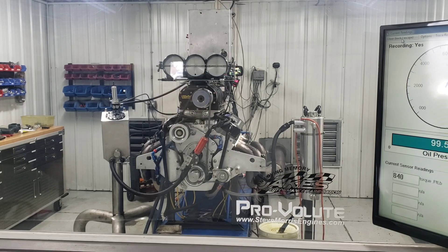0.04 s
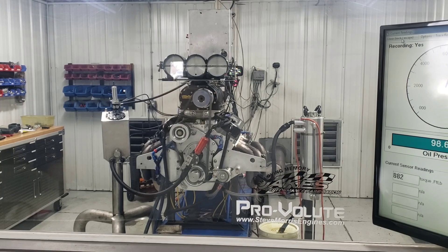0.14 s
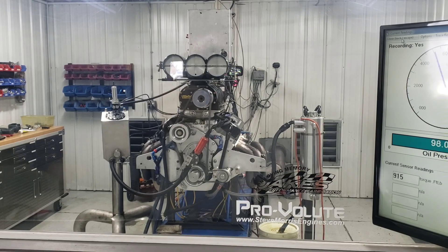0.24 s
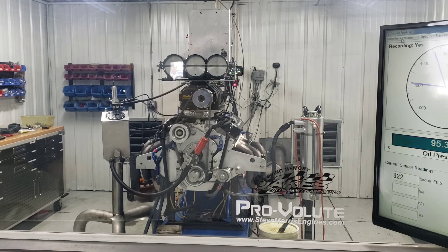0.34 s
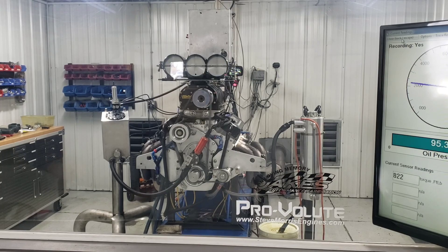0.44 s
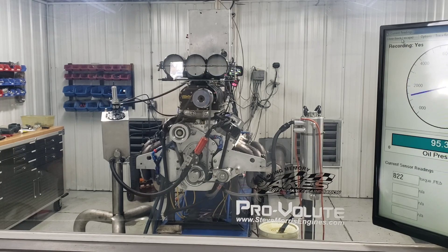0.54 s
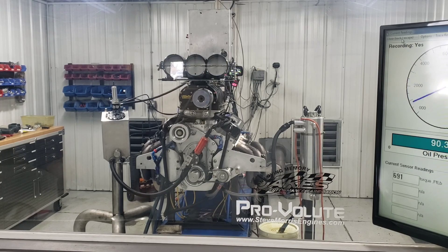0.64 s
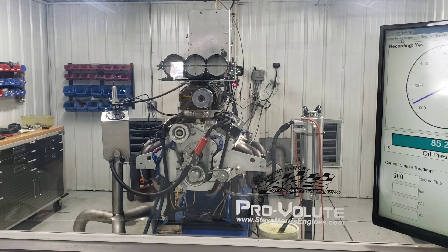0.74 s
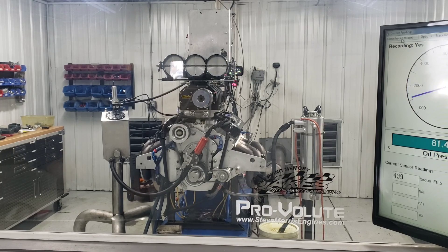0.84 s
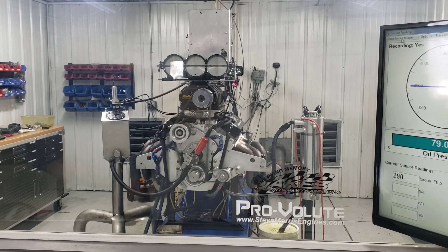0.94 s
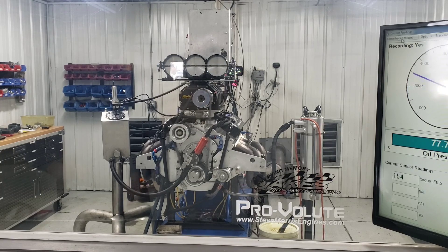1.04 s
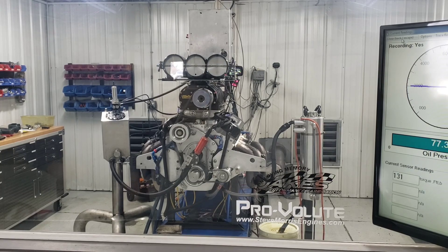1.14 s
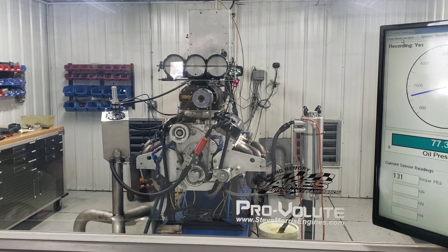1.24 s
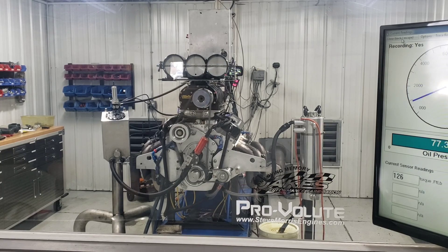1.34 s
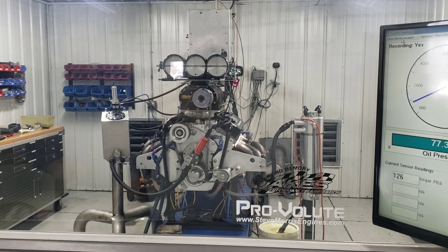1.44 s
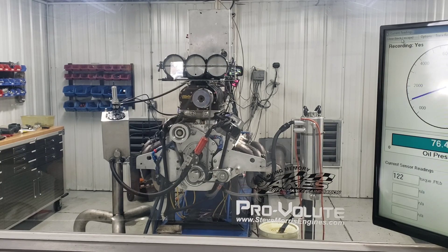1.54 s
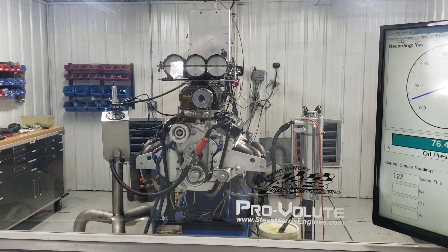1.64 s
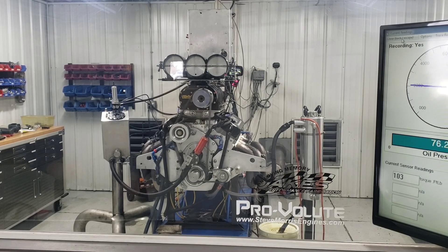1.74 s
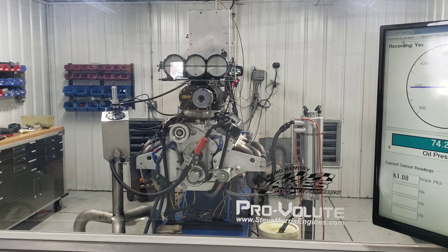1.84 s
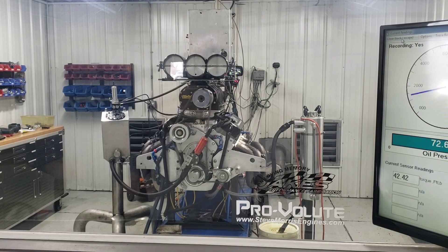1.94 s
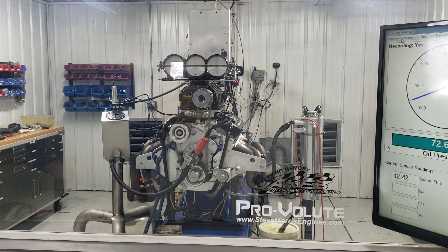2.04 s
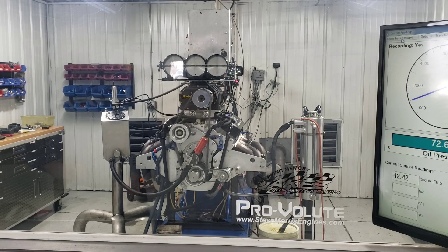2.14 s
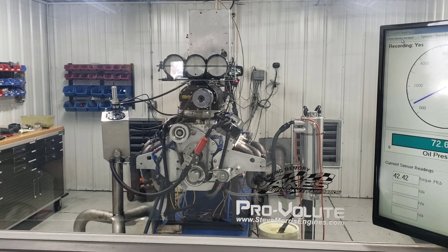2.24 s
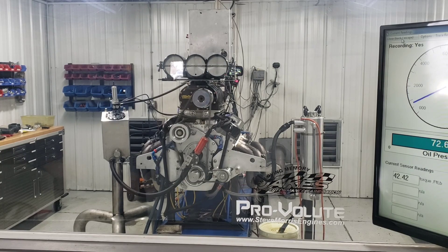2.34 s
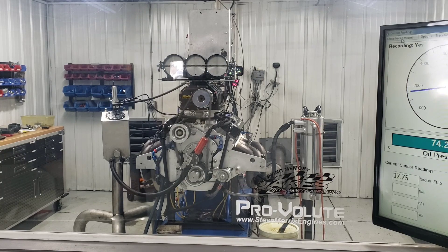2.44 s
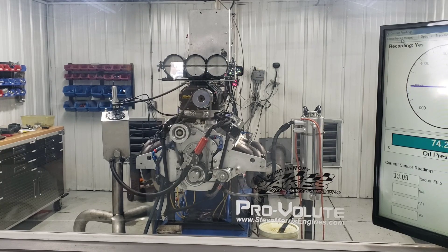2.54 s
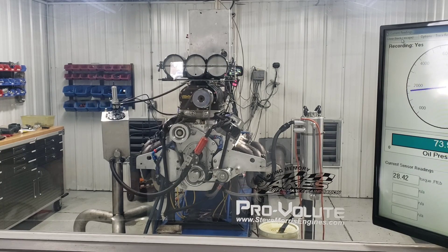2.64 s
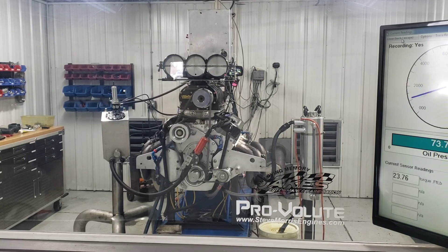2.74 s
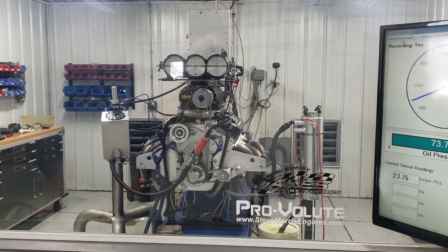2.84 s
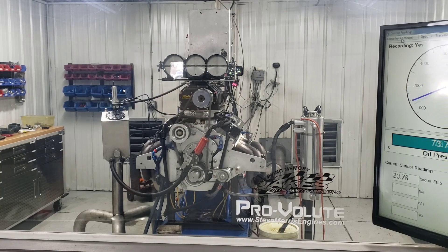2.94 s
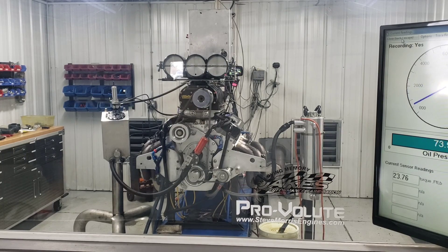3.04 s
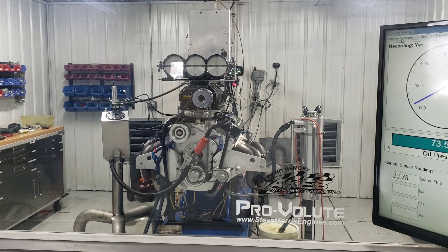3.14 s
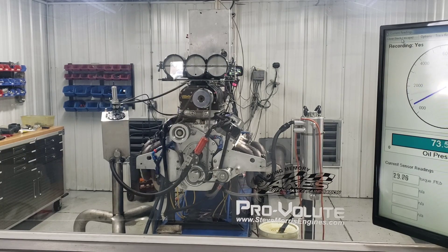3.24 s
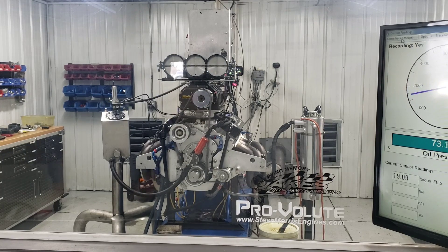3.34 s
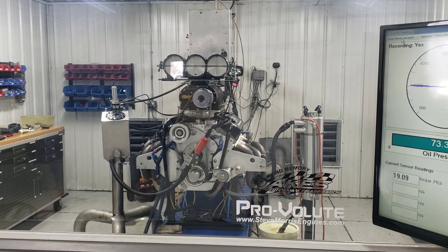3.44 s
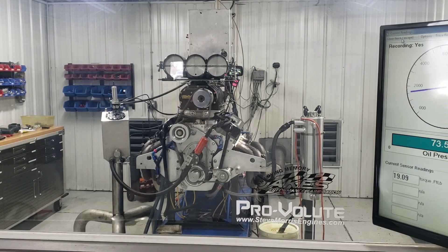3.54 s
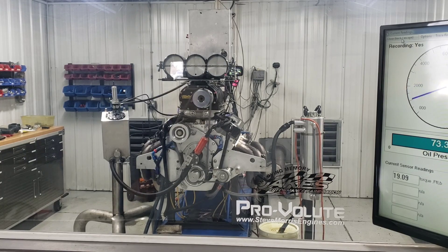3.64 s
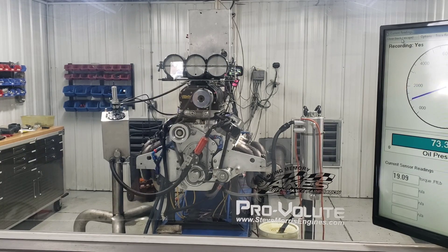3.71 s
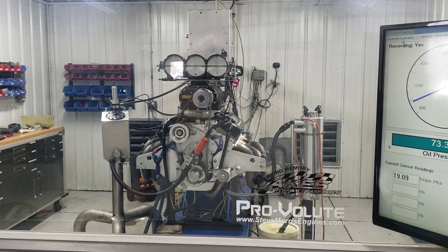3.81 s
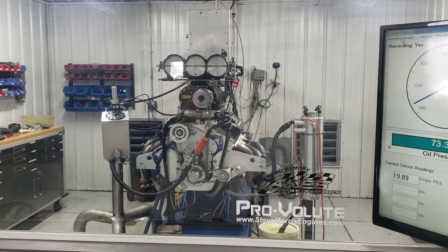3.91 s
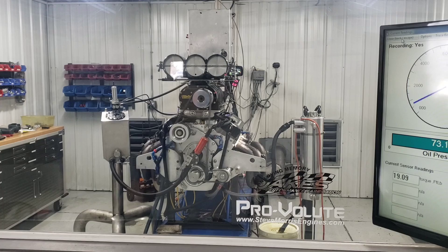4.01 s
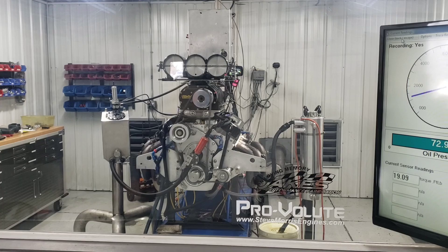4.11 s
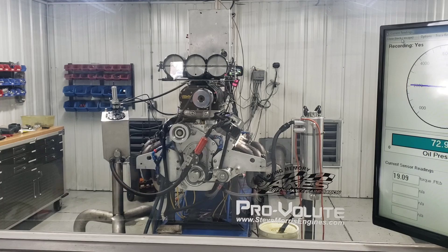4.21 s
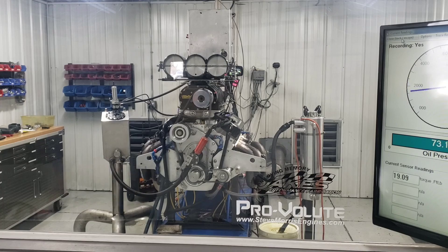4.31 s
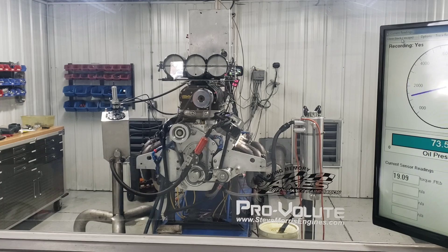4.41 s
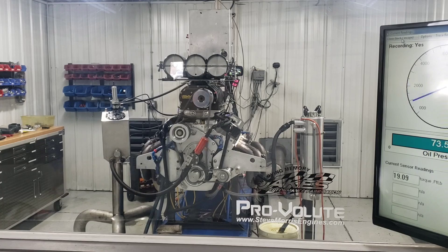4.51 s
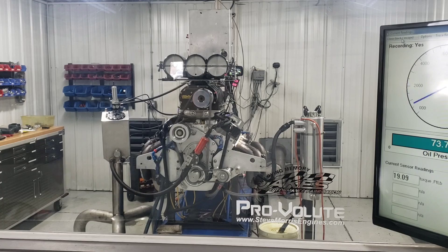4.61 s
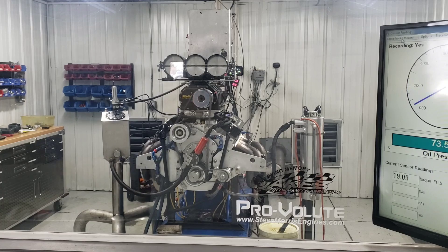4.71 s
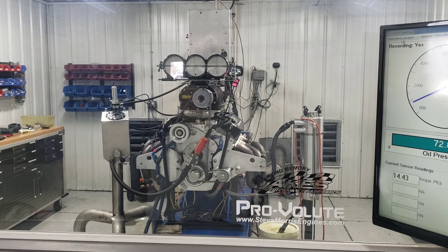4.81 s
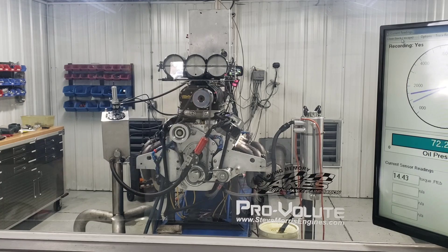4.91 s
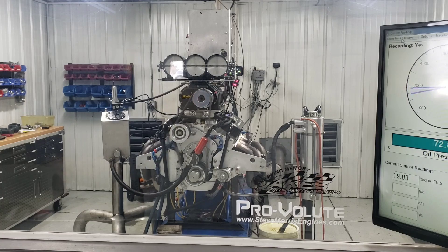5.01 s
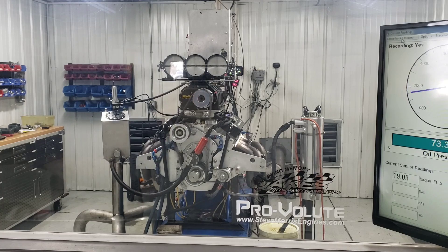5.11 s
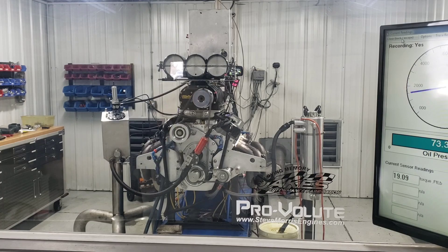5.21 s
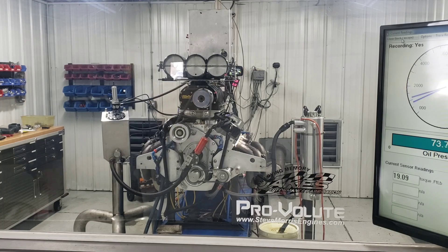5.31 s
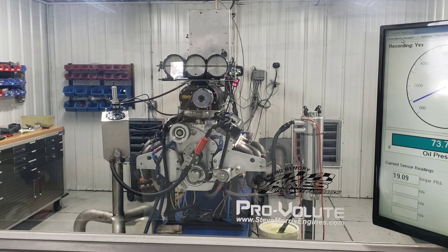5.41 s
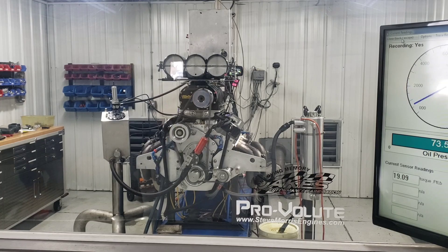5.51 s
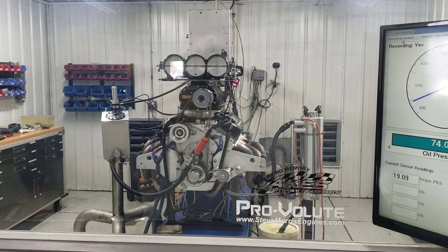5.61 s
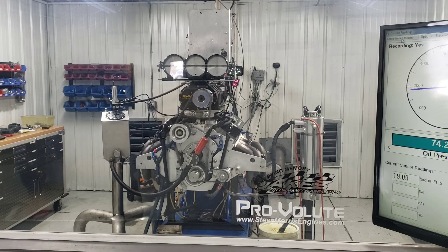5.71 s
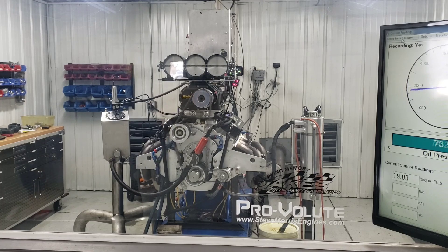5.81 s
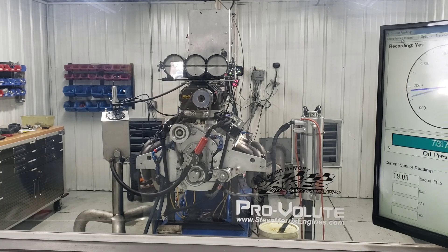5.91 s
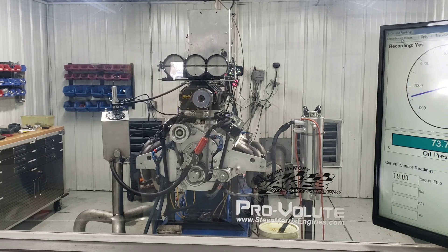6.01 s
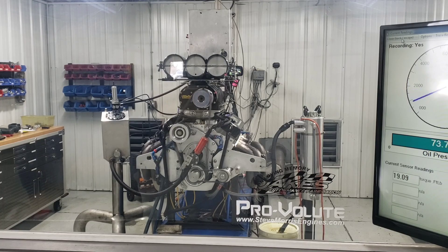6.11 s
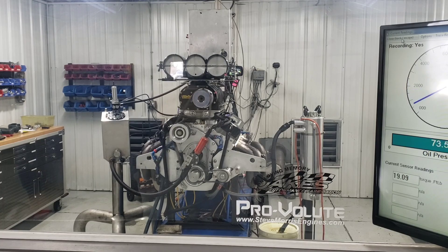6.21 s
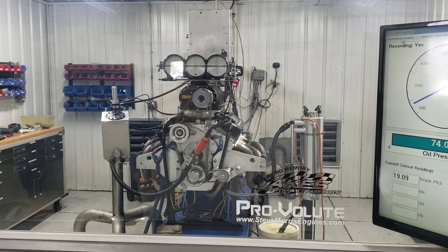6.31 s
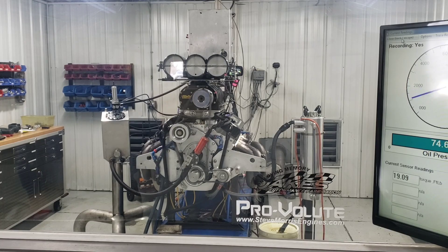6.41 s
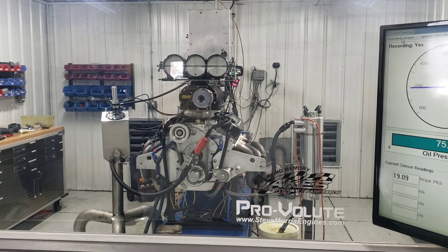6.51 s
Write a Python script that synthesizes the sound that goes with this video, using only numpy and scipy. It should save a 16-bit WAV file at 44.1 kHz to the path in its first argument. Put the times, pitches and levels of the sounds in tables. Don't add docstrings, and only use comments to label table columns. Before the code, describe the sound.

The tail of a full-power pull from a big supercharged V8 drops off within half a second, its whine fading and the metal-walled test cell ringing. A quiet lull follows, then the idle hunts: eight lumpy surges, the first ones dull and faint, later ones booming and barking with metallic valve clatter and sharp intake hiss. Stereo microphone, brighter on the left, its gain recovering after the loud start.

```python
import sys
import numpy as np
from scipy import signal
from scipy.fft import rfft, irfft
from scipy.io import wavfile
from scipy.ndimage import uniform_filter1d

SR = 44100
rng = np.random.default_rng(int(sys.argv[2]) if len(sys.argv) > 2 else 0)


def volts_from_db(level):
    exponent = np.asarray(level, float) / 20
    return 10 ** exponent


def wav_out(sig):
    wavfile.write(sys.argv[1], SR, np.round(np.clip(np.atleast_2d(sig).T, -1, 1) * 32767).astype(np.int16))


N = 288855

# hardest firing in seconds, climb to it in ms, fastest firing rate in Hz,
# boom level in dB, bark and hiss level in dB.
IDLE_SURGES = [
    (.92, 335, 137.4, -25.5, -33.5),
    (1.63, 290, 143.4, -26, -37.5),
    (2.39, 300, 144, -19.5, -34),
    (3.23, 377, 144.9, -15, -29.5),
    (4.07, 319, 138.3, -17, -29),
    (4.90, 355, 133.6, -15.5, -29),
    (5.65, 309, 124, -16, -29.5),
    (6.37, 277, 126.4, -13, -30.5),
]
CELL_T60_S = 1.6


def curves(table):
    s, *columns = np.transpose(table)
    return [np.interp(np.arange(N) / SR, s, column) for column in columns]


def across(table):
    hz, value = np.transpose(table)
    return np.interp(np.log(np.fft.rfftfreq(N, 1 / SR) + 1), np.log(hz), value)


def unit(x):
    return x / np.sqrt(np.mean(x ** 2))


def noise(channels=2):
    return rng.standard_normal((channels, N))


def colour(x, spectrum):
    return unit(irfft(rfft(x) * volts_from_db(across(spectrum)), N))


def ring(x, modes):
    size = N + SR
    f = np.fft.rfftfreq(size, 1 / SR)
    response = 0
    for k, (hz, width, db) in enumerate(modes):
        damping = 1j * f * width
        response = response + (-1) ** k * volts_from_db(db) * damping / (hz ** 2 - f ** 2 + damping)
    return irfft(rfft(x, size) * response, size)[..., :N]


def walk(rate):
    k = int(SR / rate)
    held = np.repeat(rng.standard_normal(N // k + 1), k)
    return uniform_filter1d(uniform_filter1d(held, k), k)[:N]


def cell(x, t60, direct_db):
    t = np.arange(SR) / SR
    tails = rng.standard_normal((2, len(t))) * np.exp(-np.log(1000) * t / t60)
    tails /= np.sqrt(np.sum(tails[0] ** 2))
    tails[:, 0] += volts_from_db(direct_db)
    already_ringing = np.pad(x, (len(t), 0), "reflect")[None]
    return signal.fftconvolve(already_ringing, tails)[:, len(t):len(t) + N]


def speed():
    # time in seconds, firing rate in Hz.
    throttle_shut = [
        (0, 436.3),
        (.13, 417.1),
        (.24, 415.7),
        (.44, 194.6),
    ]
    at_hardest_share, dropped_hz, sag_left_hz = .92, 91.7, 6
    overrun_s, hang_s, drop_s, sag_s = .11, .04, .08, .13
    settled_top_hz, settled_low_hz, undershoot = 124, 87.75, .62
    points = list(throttle_shut)
    low = 97.26
    for hardest, climb_ms, top, *_ in IDLE_SURGES:
        points.append((hardest - climb_ms / 1000, low))
        low = settled_low_hz - undershoot * (top - settled_top_hz)
        times = hardest + np.cumsum([0, overrun_s, hang_s, drop_s, sag_s])
        points += zip(times, [at_hardest_share * top, top, top, dropped_hz, low + sag_left_hz])
    return curves(points)[0]


def effort(layer, column):
    rest = {"boom": (-41, 200, 35, -36.5, 0.9), "bark": (-26.5, 125, 168, -39, 0.75),
            "gear": (-19.5, 114, 57, -45.5, .9), "edge": (-33.5, 90, 99, -60, 0.6),
            "air": (-35.5, 40, 120, -67, 2)}
    swell = {"boom": (-0.56, 21, 64, 29, 128), "bark": (4.3, 6.5, 86, 39, 97),
             "gear": (-0.43, -2, 71.5, 62, 52), "edge": (-6, 4, 65, 38, 99), "air": (-8, 38, 61, 40, 162)}
    rebound = {"boom": (-14, 232, 152, 103), "bark": (-13, 248, 125, 41), "gear": (-46, 297, 53, 35),
               "edge": (-36, 328, 68, 10), "air": (-36, 316, 150, 78)}
    # time in seconds, level in dB.
    duck = [(0, -26), (.55, -19.5), (1.3, -19), (2.05, -9.5), (2.7, 3.8), (4.5, 1), (6.55, 2.8)]
    full_db, dulling = -28, {"edge": 0.52, "air": 0.67}.get(layer, 0)
    catch_s = .13
    t = np.arange(0, N / SR, 1 / 1000)

    def hump(db, s, rise, hold_ms, fall):
        climb = rise * np.maximum(s - t, 0)
        return volts_from_db(db - climb - fall * np.maximum(t - s - hold_ms / 1000, 0))

    pull_db, held, fade, lull_db, share = rest[layer]
    over_db, early, rise, hold, fall = swell[layer]
    again_db, after, again_rise, again_fall = rebound[layer]
    lull = volts_from_db(lull_db + share * np.interp(t, *np.transpose(duck)))
    total = hump(pull_db, 0, 0, held, fade) + lull
    for row in IDLE_SURGES:
        hardest, climb_ms = row[:2]
        catch = hardest - climb_ms / 1000
        db = row[column] + dulling * (row[column] - full_db)
        caught = np.clip((t - catch) / catch_s, 0, 1)
        total += hump(db + over_db, hardest - early / 1000, rise, hold, fall) * caught
        total += hump(db + again_db, hardest + after / 1000, again_rise, 0, again_fall)
    return curves(np.transpose([t, 20 * np.log10(total)]))[0]


def firings(hz, jitter, scatter_db):
    cylinder_db = [5.5, 5, -3, 1.5, 4.5, -3.5, -0.5, 3]
    turns = np.cumsum(hz) / SR
    at = np.flatnonzero(np.diff(np.floor(turns)))
    chance = rng.standard_normal((N // 100, 2))[:len(at)]
    late = (jitter * chance[:, 0] * SR / hz[at]).astype(int)
    strength_db = np.resize(cylinder_db, len(at)) + scatter_db * chance[:, 1]
    pulses = np.zeros(N)
    pulses[np.clip(at + late, 0, N - 1)] = volts_from_db(strength_db)
    return pulses, turns % 1


def exhaust():
    # frequency in Hz, width in Hz, level in dB.
    boom_modes = [(47.4, 7.7, -7.5), (86.6, 8.6, -2), (116.88, 10.9, 1), (138.6, 7.4, 2.5)]
    bark_modes = [(238.2, 51, 3.5), (271, 35, -3), (312, 14, -24), (377, 23.4, 3.5), (470, 117, -6.5),
                  (640.6, 54, -2)]
    # frequency in Hz, density in dB per Hz.
    gas_spectrum = [(130, -1), (190, -1), (250, 0), (400, -11), (700, -13.5), (1100, -17.5), (1800, -37.5),
                    (3000, -56)]
    # frequency in Hz, density in dB per Hz.
    rumble_spectrum = [(20, -34), (32, -11), (48, -12), (70, -3), (110, 5.5), (150, -7.5), (200, -12.5),
                       (400, -42.5)]
    boom_db, bark_db = effort("boom", column=3), effort("bark", column=4)
    pulses, phase = firings(speed(), jitter=.05, scatter_db=3.2)
    pulses = unit(pulses - uniform_filter1d(pulses, size=2000))
    lumps = volts_from_db(4.5 * walk(35))
    boom = ring(pulses * lumps * volts_from_db(boom_db + 23.5), boom_modes)
    bark = ring(cell(pulses * volts_from_db(bark_db + 8), 0.22, 5.0), bark_modes)
    puffs = noise(1)[0] * np.exp(-phase / 0.29) + volts_from_db(-5.5) * pulses
    gas = volts_from_db(bark_db - 0.5) * colour(cell(puffs, CELL_T60_S, -7), gas_spectrum)
    rumble = volts_from_db(0.61 * boom_db - 16 + 4.9 * walk(9)) * colour(noise(), rumble_spectrum)
    boom = boom + ring(volts_from_db(0.69 * boom_db + 11.5) * noise(1)[0], boom_modes)
    return boom + bark + gas + rumble, phase


def valve_gear(phase):
    # frequency in Hz, density in dB per Hz.
    gear_spectrum = [(500, -9.5), (1100, -11), (1750, -13), (2300, -11.5), (3000, -8), (4500, -7.5),
                     (5200, -6), (5620, 2), (6300, -10.5), (7180, -27.5), (8200, -37), (10000, -58),
                     (15600, -70)]
    edge_spectrum = [(6000, -62), (7300, -20), (7900, -10), (8600, -13), (9900, 1), (11000, -9),
                     (12500, -14.5), (15600, -35)]
    gear_db, edge_db = effort("gear", column=4), effort("edge", column=4)
    bunching = 1 + .5 * np.exp(-phase / 0.038)
    ticks = noise(1)[0] * volts_from_db(3.44 * rng.exponential(size=N)) * bunching
    ticks = unit(cell(ticks, CELL_T60_S, -11.0)) + 1.26 * noise()
    roar = volts_from_db(gear_db + 5 + 0.78 * walk(18)) * colour(ticks, gear_spectrum)
    edge = volts_from_db(edge_db + 5.0 + 2.3 * walk(21.64)) * colour(ticks, edge_spectrum)
    return roar + edge


def intake_air():
    # frequency in Hz, density in dB per Hz.
    air_spectrum = [(2500, -36), (5000, 8.5), (7200, -4), (8600, -12), (9950, 5.5), (11500, -1),
                    (13400, -7.5), (15700, -5.5)]
    # start in seconds, peak in dB, 60 dB decay in seconds.
    throttle_spits = [(2.1593, -61, 0.31), (2.582, -56, 0.36), (2.8497, -36, 0.23), (2.9431, -32, 0.56),
                      (3.2055, -27, 0.26), (3.7921, -29, 0.32), (3.9015, -30, 0.48), (4.553, -28, 0.3),
                      (4.622, -31, 0.33), (5.332, -31.5, 0.2), (5.3987, -37, 0.32), (5.4869, -35, 0.29),
                      (5.5692, -29, 0.3), (6.131, -35, 0.28)]
    attack_s = .012
    t = np.arange(N) / SR
    level = volts_from_db(effort("air", column=4) + 9.0 + 2.0 * walk(14))
    for s, db, t60 in throttle_spits:
        decay = np.exp(-np.log(1000) * np.abs(t - s) / t60)
        level += volts_from_db(db - 4.5) * np.clip((t - s) / attack_s, 0, 1) * decay
    return level * colour(noise(), air_spectrum)


def blower_whine():
    # time in seconds, pitch in Hz, level in dB.
    whine_track = [(0, 865, -32), (.04, 874, -22), (.12, 850, -35), (.2, 844, -34.5), (.3, 854, -54),
                   (.55, 831, -74), (.8, 830, -92)]
    hz, db = curves(whine_track)
    level = volts_from_db(db + 3 * walk(50))
    return level * np.sin(2 * np.pi * np.cumsum(hz + 18 * walk(60)) / SR)


def ringing_room():
    # frequency in Hz, loudest moment in seconds, level in dB, 60 dB decay in seconds.
    struck_modes = [(57, .08, -52, 0.69), (121, 0.011, -45, 0.3), (139.3, 0.14, -25.5, 0.4),
                    (164.6, 0.13, -30.5, 0.72), (170, 0.024, -31, 1.13), (264, 0.1, -37, 0.16)]
    t = np.arange(N) / SR
    fading = np.zeros(N)
    for hz, s, db, t60 in struck_modes:
        level = volts_from_db(db - 60 * np.abs(t - s) / t60 + 1.5 * walk(21))
        fading += level * np.sin(2 * np.pi * hz * t)
    return fading


def pump():
    # time in seconds, level in dB.
    pump_level = [(0, -82), (1, -65), (2, -62), (3, -50.5), (4.5, -53.5), (6.55, -50)]
    level = volts_from_db(curves(pump_level)[0] - 3 + 3 * walk(40) + 4 * walk(7))
    return level * np.sin(2 * np.pi * np.cumsum(1954 + 9 * walk(30)) / SR)


def scene():
    # frequency in Hz, correlation from 0 to 1.
    common_share = [(60, 1), (150, 0.84), (300, 1), (450, 0.9), (650, 0.1), (1300, 0.41), (2000, 0.03),
                    (15000, 0)]
    # frequency in Hz, right minus left in dB.
    right_minus_left = [(60, -0.5), (150, -2), (400, -2.5), (1200, -1.5), (2200, -9), (4400, -7), (5700, -12),
                        (7000, -5.5), (10000, -18.5), (12500, -7), (15500, -18)]
    right_lag = 21
    pipes, phase = exhaust()
    high_tones = (blower_whine() + pump()) * np.array([[1], [.4]])
    tones = 2 * (ringing_room() + high_tones)
    near, other = rfft(pipes + valve_gear(phase) + intake_air() + tones)
    share = np.clip(across(common_share), 0, 1)
    lag = np.exp(-2j * np.pi * np.fft.rfftfreq(N) * right_lag)
    far = share * near * lag + np.sqrt(1 - share ** 2) * other
    return irfft(np.array([near, far * volts_from_db(across(right_minus_left))]), N)


def roll_off(x):
    return signal.sosfilt(signal.butter(12, 15760, fs=SR, output="sos"), x)


def record(dry):
    bass_cut = signal.butter(4, 41, "high", fs=SR, output="sos")
    return roll_off(signal.sosfilt(bass_cut, dry))


dry = scene()
out = record(dry)
wav_out(out)
```